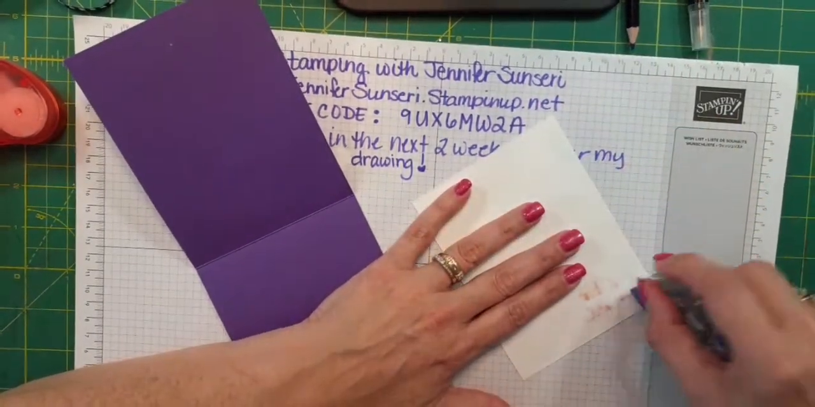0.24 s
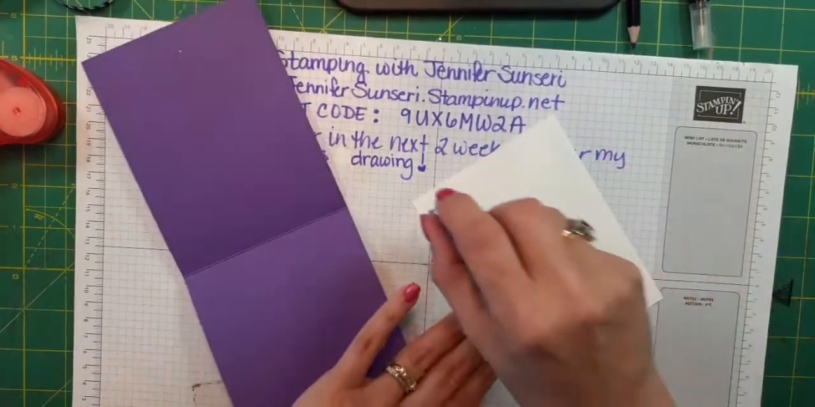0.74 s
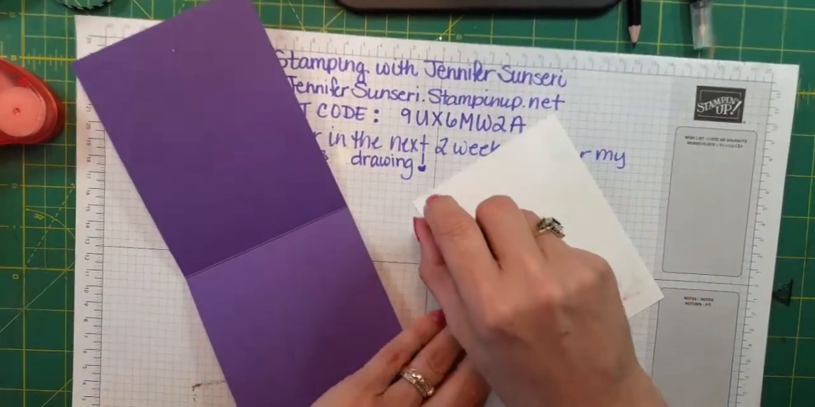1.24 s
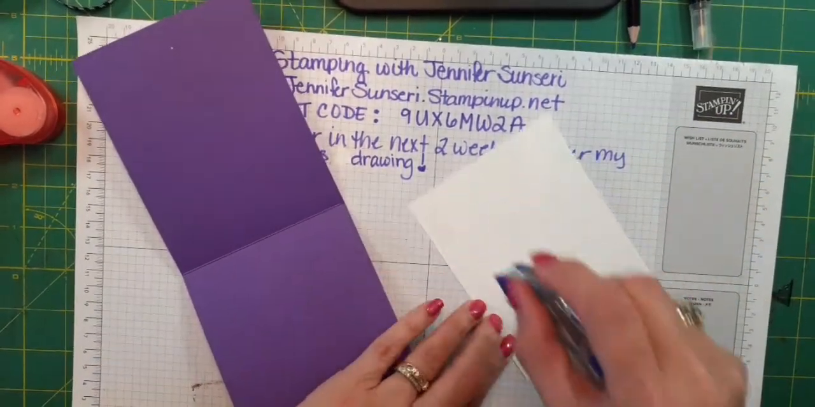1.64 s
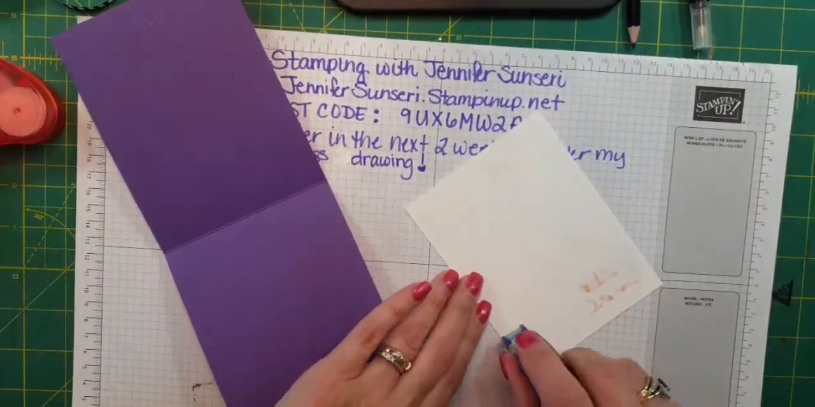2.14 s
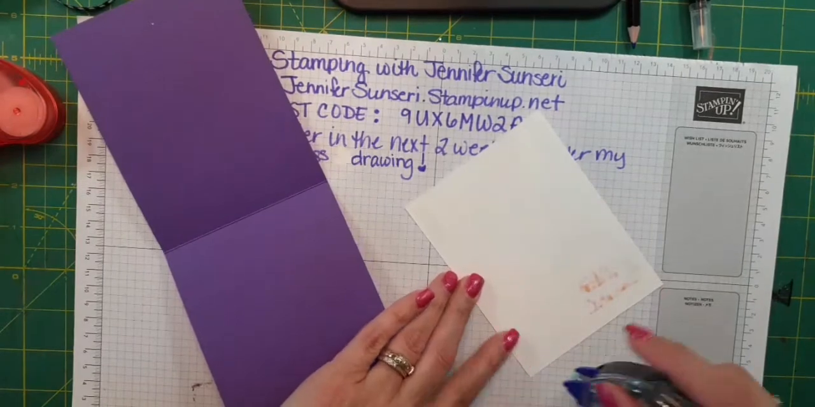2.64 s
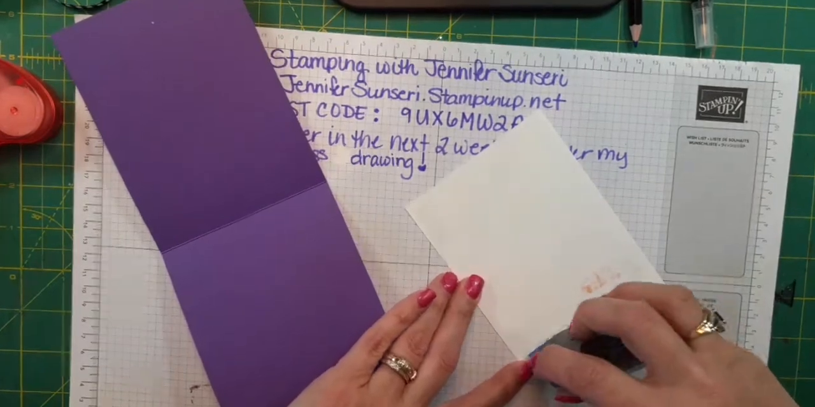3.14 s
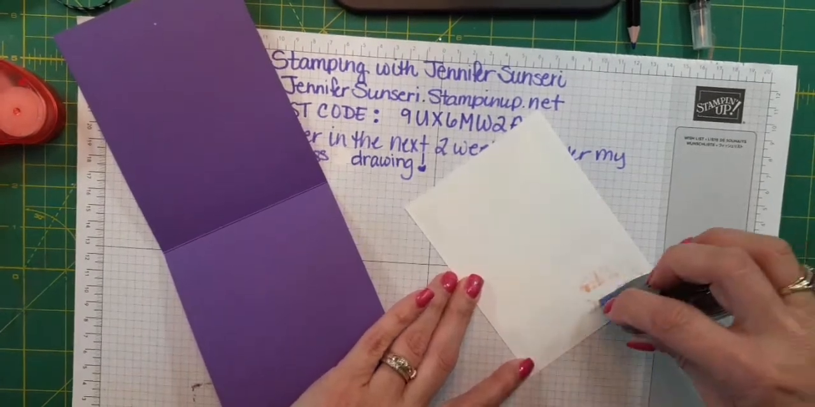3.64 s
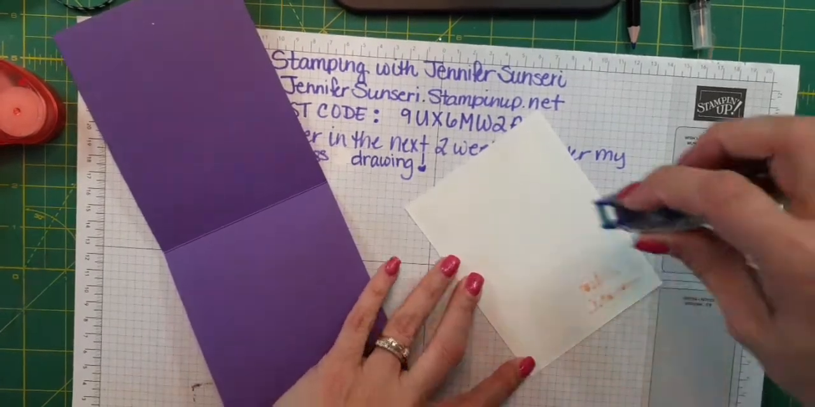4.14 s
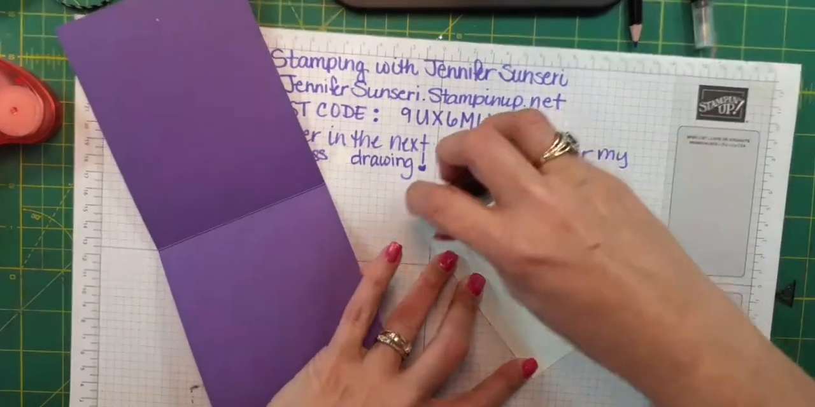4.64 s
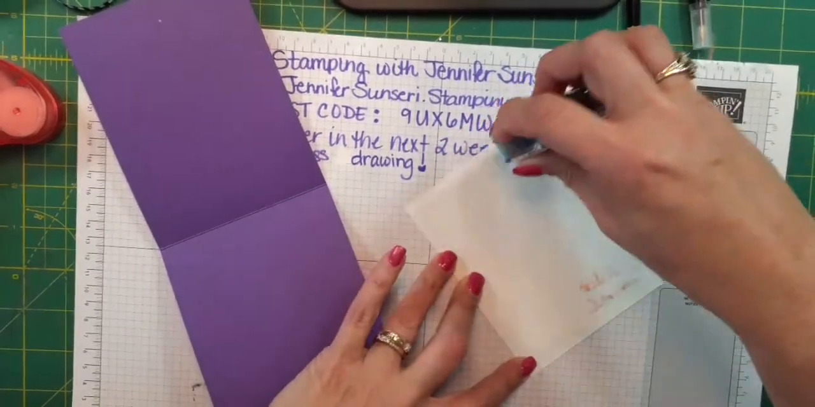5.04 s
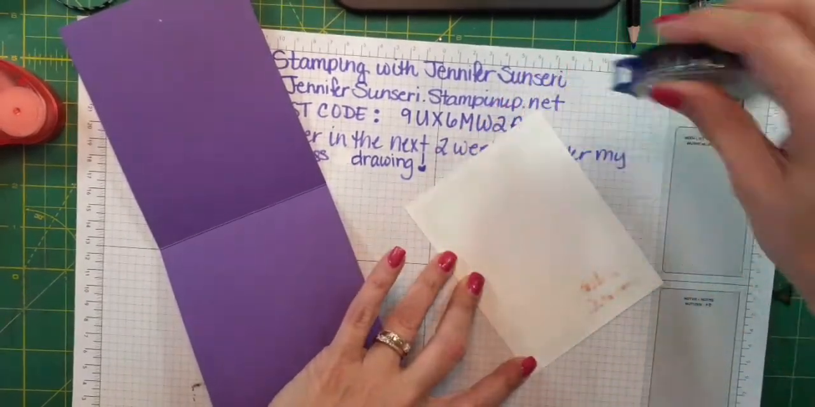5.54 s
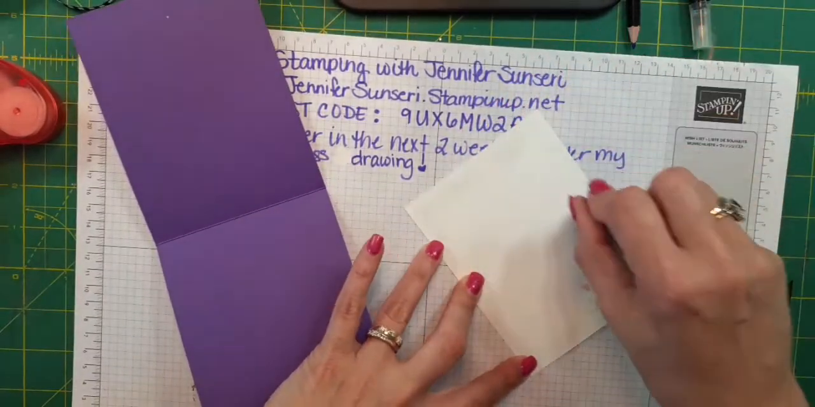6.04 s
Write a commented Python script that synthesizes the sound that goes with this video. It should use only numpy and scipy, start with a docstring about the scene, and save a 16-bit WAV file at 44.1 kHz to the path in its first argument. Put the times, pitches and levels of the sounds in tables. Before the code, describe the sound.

Close by at a craft table, a small plastic tape runner makes eight brief ratcheting zips on paper, each a rapid run of crisp clicks with a sticky hiss. Between them come light snaps, tip knocks, faint paper brushing and soft hand thumps. A low, slightly wavering electrical hum continues in a small, fairly dry room.

```python
"""Small humming room, craft table: a tape runner is drawn in eight short strokes along a paper panel.
Runner: noise bursts, one per ratchet tooth, plus peel hiss, drive table, shell, pawl, glue and case ring.
Hands: the tip knocks down and snaps free (ringing noise bursts), fingers slide on paper (grainy hiss),
and the hand's weight thumps the table (decaying sines).
Background: a wavering low drone with mains hum, rumble and faint hiss."""
import sys
import numpy as np
from scipy import signal
from scipy.fft import rfft, irfft
from scipy.io import wavfile
from scipy.ndimage import uniform_filter1d

SR = 44100
rng = np.random.default_rng(int(sys.argv[2]) if len(sys.argv) > 2 else 0)


def put_to_file(sound):
    """Save the sound as 16-bit audio at rate SR, in the file named by the first command-line argument."""
    columns = np.atleast_2d(sound).T  # one column per channel
    safe = np.clip(columns, -1, 1)
    whole_steps = np.round(safe * 32767)
    wavfile.write(sys.argv[1], SR, whole_steps.astype(np.int16))


N = 277389
TIME = np.arange(N) / SR


def from_db(db):
    """Decibels to amplitude."""
    return 10 ** (np.asarray(db) / 20)


def rms_one(x):
    """Scale to rms 1."""
    return x / np.sqrt(np.mean(x ** 2) + 1e-20)


def colour(x, spectrum, size=8192):
    """Minimum-phase filter with the given spectrum; white noise keeps its power."""
    hz, level_db = np.transpose(spectrum)
    grid_hz = np.maximum(np.arange(size // 2 + 1) * SR / size, 1)
    gain = rms_one(from_db(np.interp(np.log(grid_hz), np.log(hz), level_db)))
    # fold the cepstrum to make the filter causal
    cepstrum = irfft(np.log(gain))
    cepstrum[1:size // 2] *= 2
    cepstrum[size // 2 + 1:] = 0
    impulse = irfft(np.exp(rfft(cepstrum)))
    return signal.oaconvolve(x, impulse[None], axes=1)[:, :x.shape[1]]


def resonance(x, hz, width_hz):
    """One two-pole mode; white noise keeps its power."""
    r = np.exp(-np.pi * width_hz / SR)
    zeros = np.sqrt((1 - r * r) / 2) * np.array([1, 0, -1])
    poles = [1, -2 * r * np.cos(2 * np.pi * hz / SR), r * r]
    return signal.lfilter(zeros, poles, x + 1e-18)


def lowpass(x, order, hz):
    """Butterworth low-pass."""
    return signal.sosfilt(signal.butter(order, hz, fs=SR, output="sos"), x)


def close_pair(x, apart_hz=700, bass_share=0.23):
    """Long waves reach two close microphones almost alike: the side signal loses bass."""
    mid, side = (x[0] + x[1]) / 2, (x[0] - x[1]) / 2
    side = side - (1 - bass_share) * lowpass(side, 1, apart_hz)
    return np.array([mid + side, mid - side])


def stereo_noise(alike, size=N):
    """White noise at two microphones with correlation alike."""
    mid, side = rng.standard_normal((2, size))
    alike = np.clip(alike, -1, 1)
    return (np.sqrt(1 + alike) * mid + np.sqrt(1 - alike) * side * [[1], [-1]]) / np.sqrt(2)


def add(out, start_s, sound):
    """Mix a short sound in at start_s."""
    at = max(round(start_s * SR), 0)
    out[..., at:at + sound.shape[-1]] += sound[..., :out.shape[-1] - at]


def contact(noise, rise_s, hold_s, fade_s):
    """A contact chatters briefly, then dies; energy equals 4 ms at rms 1."""
    t = TIME[:noise.shape[1]]
    burst = noise * np.minimum(t / rise_s, 1) * np.exp(-np.maximum(t - hold_s, 0) / fade_s)
    return rms_one(burst) * np.sqrt(0.004 * SR / len(t))


# waver of the low tone: time_s, relative_level_db
TONE_WAVER = [(0.0, -47.5), (0.05, -50.5), (0.38, -59.5), (0.56, -48.5), (1.01, -55), (1.17, -42),
              (1.26, -52.5), (2.28, -49), (2.35, -67), (2.4, -43), (2.43, -51), (4.47, -49.5), (4.54, -79),
              (4.62, -46.5), (5.04, -59), (5.06, -46), (5.17, -55), (6.29, -49)]
# room rumble spectrum: frequency_hz, relative_level_db
RUMBLE_SPECTRUM = [(20, -14), (35, -8.5), (55, 6), (72, -1), (92, 12.5), (110, 6.5), (160, 7), (195, 7),
                   (225, -3), (270, 0.5), (340, -9.5), (600, -11), (800, -28.5), (1250, -35)]
# room hiss spectrum: frequency_hz, relative_level_db
HISS_SPECTRUM = [(500, 0), (900, 1.5), (1250, 5.5), (1700, -4), (2500, -7.5), (4000, -13), (6300, -12),
                 (9000, -21), (13000, -12.5), (16000, -21)]


def background(mains_hz=120, drone_hz=124):
    """Narrow-band noise beside a mains-hum sine wavers in level, over rumble and faint hiss."""
    drone = resonance(stereo_noise(1.0), drone_hz, width_hz=30.4)
    drone = rms_one(resonance(drone, drone_hz, width_hz=22.0))
    tone = drone + np.sin(2 * np.pi * mains_hz * TIME)
    # level it over a third of a second, then apply the waver
    tone = tone / np.sqrt(uniform_filter1d(np.mean(tone ** 2, axis=0), SR // 3))
    waver = from_db(np.interp(TIME, *np.transpose(TONE_WAVER)))
    rumble = lowpass(colour(stereo_noise(0.75), RUMBLE_SPECTRUM), 2, 1300)
    low = from_db(0.5) * waver * tone + from_db(-56.0) * rumble
    hiss = from_db(-72) * colour(stereo_noise(0.078), HISS_SPECTRUM)
    return low * from_db([[0.7], [-0.7]]) + hiss  # lows lean left


def room(x, bounce_db=-8, near_db=-7, near_t60_s=0.081, far_db=-13, far_t60_s=0.27):
    """The table top bounces sound after 3 ms, nearby things scatter it, walls add a duller tail."""
    t = TIME[:SR // 2]
    onset = np.clip((t - 0.006) / 0.00068, 0, 1)
    shapes = [np.exp(-((t - 0.003) / 0.00041) ** 2),
              onset * from_db(-60 * t / near_t60_s),
              onset * from_db(-60 * t / far_t60_s)]
    bounce, near, far = [rms_one(stereo_noise(0.1, len(t)) * shape) / np.sqrt(len(t)) for shape in shapes]
    far = lowpass(far, 1, 9000)
    echoes = from_db(bounce_db) * bounce + from_db(near_db) * near + from_db(far_db) * far
    return x + signal.oaconvolve(x, echoes, axes=1)[:, :N]


# the hand's weight landing on the table: start_s, level_db
THUMP_EVENTS = [(2.14, -54.5), (3.039, -49.5), (3.61, -51), (4.43, -58.5), (5.061, -44.5)]


def thumps(table_hz=54, swell_s=0.023, board_hz=272, board_db=-8, board_s=0.018):
    """The table top swings slowly under the hand, with a shorter boom above."""
    t = TIME[:SR // 2]

    def swelling_sine(hz, peak_s):
        return (t / peak_s * np.exp(1 - t / peak_s)) ** 2 * np.sin(2 * np.pi * hz * t)

    thump = swelling_sine(table_hz, swell_s) + from_db(board_db) * swelling_sine(board_hz, board_s)
    out = np.zeros((2, N))
    for start_s, level_db in THUMP_EVENTS:
        add(out, start_s, from_db(level_db) * thump)
    return out


# fingers and paper sliding: start_s, length_s, relative_level_db
SLIDE_EVENTS = [(0.178, 0.22, -70), (0.318, 0.11, -61.5), (0.395, 0.11, -62.5), (0.516, 0.2, -72.5),
                (0.685, 0.091, -74.5), (1.31, 0.12, -65.5), (1.533, 0.15, -67.5), (1.76, 0.3, -73.5),
                (1.909, 0.056, -71.5), (2.47, 0.26, -72.5), (2.647, 0.21, -66.5), (2.815, 0.12, -68.5),
                (3.606, 0.13, -67.5), (3.906, 0.079, -55.5), (3.967, 0.082, -64.5), (4.01, 0.22, -71.5),
                (5.493, 0.082, -61), (5.566, 0.1, -60), (5.785, 0.068, -62.5), (6.243, 0.07, -72.5)]
# brushed paper spectrum: frequency_hz, relative_level_db
PAPER_SPECTRUM = [(1200, -11.5), (2500, -4.5), (4000, -6.5), (6300, -3.5), (9000, -8), (13000, -6.5),
                  (16000, -8)]


def slides(grains_per_s=140, grain_db=7, attack_share=0.23):
    """Skin and paper brush with a faint fibrous hiss; now and then a fibre catches."""
    level = np.zeros(N)
    for start_s, length_s, level_db in SLIDE_EVENTS:
        progress = (TIME - start_s) / length_s
        level += from_db(level_db) * np.interp(progress, [0, attack_share, 1], [0, 1, 0])
    grains = 1.0 * (rng.random(N) < grains_per_s / SR)
    catches = signal.lfilter([1], [1, -np.exp(-1 / (0.0014 * SR))], grains + 1e-18)
    roughness = from_db(1.5 * rng.standard_normal(N))
    fibres = rms_one(stereo_noise(0.057) * roughness * (1 + from_db(grain_db) * catches))
    return from_db(-0.5) * colour(level * fibres, PAPER_SPECTRUM)


# bright edge of knocks and ticks: frequency_hz, relative_level_db
EDGE_SPECTRUM = [(3000, -26.5), (5200, -3), (6800, 1), (9000, -0.5), (13000, -4), (16000, 0)]


def touches(events, spectrum, rise_s, fade_s, ring_db):
    """Light contacts: a coloured body, a bright edge, and a ring that depends on the spot touched."""
    body, edge, rings = np.zeros((3, 2, N))
    for start_s, level_db, sharp_db, ring_hz in events:
        noise = stereo_noise(0.11, size=2048)
        touch = from_db(level_db) * contact(noise, rise_s, hold_s=rise_s, fade_s=fade_s)
        add(body, start_s, touch)
        add(edge, start_s, from_db(sharp_db) * touch)
        add(rings, start_s, resonance(touch, ring_hz, width_hz=0.065 * ring_hz))
    ringing_body = colour(body, spectrum) + from_db(ring_db) * rings
    return ringing_body / np.hypot(1, from_db(ring_db)) + colour(edge, EDGE_SPECTRUM)


# tip snapping free, case ticking in the grip: start_s, relative_level_db, sharpness_db, ring_hz
TICK_EVENTS = [(2.15, -69, 2, 3550), (2.539, -68.5, 2, 2290), (2.651, -64, -7, 2170), (2.676, -57, 2, 2020),
               (2.682, -56, -7, 2040), (2.76, -57.5, -5, 3040), (3.924, -53.5, 11, 4730),
               (3.942, -46, 5.5, 5160), (4.778, -55, 8, 6140), (4.794, -60.5, 5, 5700),
               (5.117, -57, -11, 1970), (5.337, -44.5, -5.5, 3370), (5.354, -47, -5, 2940),
               (5.392, -56, -7, 3700), (5.494, -60.5, 0, 1980), (5.587, -54, -2, 2800),
               (6.138, -76, 9, 5710)]
# tick body spectrum: frequency_hz, relative_level_db
TICK_SPECTRUM = [(700, -3.5), (1300, 6), (2000, 4.5), (2600, 4.5), (3500, 4), (4800, 1.5), (6000, -9),
                 (16000, -50)]


def ticks():
    """The tip snaps free and the case ticks: fast, short contacts with a strong ring."""
    return from_db(-0.1) * touches(TICK_EVENTS, TICK_SPECTRUM, rise_s=0.00077, fade_s=0.002, ring_db=0.5)


# tip knocking down on the paper: start_s, relative_level_db, sharpness_db, ring_hz
KNOCK_EVENTS = [(3.04, -60.5, -4, 1440), (3.632, -56, -14, 1450), (4.44, -44, -25, 1314),
                (4.446, -54, -13, 1350), (4.453, -45, -33, 1340), (4.538, -49, -18, 1420),
                (4.551, -50.5, -3, 1460), (5.06, -44, -10.5, 1490), (5.07, -43.5, -29, 1890),
                (5.08, -50, -16, 1810), (5.109, -49.5, -21, 1700), (5.793, -55, -32, 1350),
                (5.813, -50, -5, 2580), (5.821, -47.5, -26, 2440), (5.876, -52, -28, 1430),
                (5.888, -49, -15, 1390)]
# knock body spectrum: frequency_hz, relative_level_db
KNOCK_SPECTRUM = [(250, -2), (600, -15), (950, -16), (1230, 5), (1500, 0), (1900, -1.5), (2300, -6),
                  (2750, -4), (3600, -10.5), (4600, -7.5), (7000, -16.5), (16000, -40)]


def knocks():
    """The tip knocks down on the paper: slower, duller contacts with a weaker ring."""
    return from_db(2.3) * touches(KNOCK_EVENTS, KNOCK_SPECTRUM, rise_s=0.0024, fade_s=0.0076, ring_db=-4)


def ratchet(count, first_ms, last_ms, starting_ms, stopping_ms,
            level_db, soft_db, fade_db, first_sharp_db, last_sharp_db):
    """Clicks of one stroke (start_s, level_db, sharp_db): the spool gets going, runs, drags to a stop."""
    start_drag_kept, stop_drag_kept = 0.3, 0.1  # share of lost time reaching the next tooth inwards
    bite_teeth, fade_power = 1.12, 2.9  # bears down within a tooth or two, eases off late
    scatter_ms, scatter_db, sharp_scatter_db = 0.25, 1.5, 2.1  # no two teeth are quite alike
    tooth = np.arange(round(count))
    gap, progress = tooth[:-1], tooth / tooth[-1]
    late, strong, sharp = rng.standard_normal((len(tooth), 3)).T
    gaps_ms = np.linspace(first_ms, last_ms, len(gap))
    gaps_ms += starting_ms * start_drag_kept ** gap
    gaps_ms += stopping_ms * stop_drag_kept ** gap[::-1]
    start_s = np.append(0, np.cumsum(gaps_ms) + scatter_ms * late[1:]) / 1000
    click_db = level_db - soft_db * np.exp(-tooth / bite_teeth) - fade_db * progress ** fade_power
    click_db += scatter_db * strong
    sharp_db = np.linspace(first_sharp_db, last_sharp_db, len(tooth)) + sharp_scatter_db * sharp
    return np.column_stack([start_s, click_db, sharp_db])


def stroke(clicks, table_db, case_hz, width_hz, ring_db, upper_db, sizzle_db, peel_db, lead_ms, pan_db=-0.5):
    """Force one stroke sends into table, shell, pawl and glue, and the ring of the hollow case."""
    t, size = TIME[:SR // 4], 1024
    middle, treble = np.zeros((2, 2, len(t)))
    pattern = stereo_noise(0.48, size)  # every tooth rattles the case in much the same way
    for start_s, level_db, sharp_db in clicks:
        rattle = pattern + 1.02 * stereo_noise(0.15, size)
        rattle[1] = np.interp(t[:size] - lead_ms / 1000, t[:size], rattle[1])
        rattle = rattle * from_db([[pan_db], [-pan_db]])
        # pawl ping varies in pitch and level per tooth
        ping_hz = 6800 * 2 ** rng.normal(0, 0.12)
        ping = from_db(-15 + 9.4 * rng.uniform(-0.87, 1)) * resonance(rattle, ping_hz, width_hz=700)
        snap = contact(rattle + ping, rise_s=0.00088, hold_s=0.0011, fade_s=0.002)
        add(treble, start_s, from_db(level_db + sharp_db) * snap)
        # the heavier shell answers more slowly
        knock = contact(rattle, rise_s=0.001, hold_s=0.0013, fade_s=0.003)
        add(middle, start_s, from_db(level_db) * knock)
    # tape peels with a grainy hiss, louder the faster the spool turns
    start_s, level_db, sharp_db = clicks.T
    speed = np.interp(t, start_s, rms_one(1 / np.gradient(start_s)), 0, 0)
    grain = from_db(3.6 * rng.standard_normal(len(t)))
    peel = from_db(peel_db) * speed * rms_one(stereo_noise(0.26, len(t)) * grain)
    middle = middle + peel * from_db(np.interp(t, start_s, level_db))
    treble = treble + peel * from_db(np.interp(t, start_s, level_db + sharp_db))
    # the blow's energy is shared out between the parts
    middle = middle / np.sqrt(1 + from_db(ring_db) ** 2 + from_db(upper_db) ** 2)
    treble = treble / np.hypot(1, from_db(sizzle_db))
    ring = from_db(ring_db) * resonance(middle, case_hz, width_hz)
    ring = ring - from_db(upper_db) * resonance(middle, 2 * case_hz, 2 * width_hz)
    return np.array([from_db(table_db) * middle, middle, treble, from_db(sizzle_db) * treble, ring])


# stroke motion: start_s, click_count (rounded), first_gap_ms, last_gap_ms, starting_loss_ms,
# stopping_loss_ms, level_db, first_click_softer_db, fade_db, first_sharpness_db, last_sharpness_db
# (gaps before the losses are added; sharpness = treble over middle)
STROKE_MOTIONS = [(0.0025, 6.45, 7.6, 20.6, 4.25, 8.7, -39.5, -2, 0.5, 8.5, 8.5),
                  (1.0839, 11.3, 14.5, 12.8, 10.6, 7.8, -33.5, 11.5, -2, 0.2, 1),
                  (2.243, 8.8, 12.4, 13.5, 12.4, 8.9, -36.5, 10, 0.5, 6.5, -0.2),
                  (3.1466, 14.5, 4.8, 10.84, 15.2, 25.7, -38, 4.5, 3.5, 4.5, 6.5),
                  (3.698, 13.8, 6.42, 6.4, 5.04, 9.3, -37, 10, 3.5, 3.5, 7.5),
                  (4.566, 16.2, 5.8, 6.6, 5.4, 11.0, -36, 6.5, 1, 2, 5.5),
                  (5.1247, 11.9, 7.1, 6.45, 2.92, 3.4, -31.5, 6, 6.5, -5, 7.5),
                  (5.9093, 11.6, 7.3, 13.2, 8.5, 7.5, -37, 4.5, 2, 1, 7.5)]
# runner in the grip, per stroke: table_db, case_hz, case_width_hz, ring_db, upper_ring_db,
# sizzle_db, peel_db, left_lead_ms
STROKE_GRIPS = [(-10, 1410, 180, -8, -19, -10, -11, 0.0905),
                (-15.5, 1420, 170, -2.5, 0, -16, -17.5, -0.061),
                (-17.5, 1410, 190, 0, -11.5, -21, -16.5, -0.0295),
                (-7.5, 1590, 300, -4.5, -14, -4.5, -15, -0.112), (-8, 1550, 420, -4.5, -20, 3.5, -4, 0.17),
                (-9.5, 1260, 750, -1.5, -10, -5, -10.5, 0.0012), (-10, 1470, 480, 3, -19, 1.5, -6, 0.094),
                (-13, 1480, 190, -5.5, -15, -8.5, -12, 0.068)]
# table under the tip: frequency_hz, relative_level_db
TABLE_SPECTRUM = [(120, -15), (260, -1), (450, -3.5), (620, -2), (800, -4.5), (1100, 6), (1600, -15),
                  (4000, -41.5)]
# plastic shell: frequency_hz, relative_level_db
SHELL_SPECTRUM = [(600, -37.5), (950, -5.5), (1200, -3.5), (1550, -10.5), (1850, -1.5), (2100, 2),
                  (2450, 1), (2950, 5.5), (3500, 0), (4200, 1.5), (5000, -0.5), (7000, -37), (16000, -66.5)]
# pawl snap: frequency_hz, relative_level_db
SNAP_SPECTRUM = [(2000, -43), (4200, -22.5), (5200, -0.5), (5900, 0), (6600, 1.5), (7400, -1), (8200, 0.5),
                 (9200, -6), (11000, -3), (12800, 5.5), (15500, 0), (17000, -37.5)]
# glue sizzle: frequency_hz, relative_level_db
SIZZLE_SPECTRUM = [(6000, -26), (10000, -7), (12000, -8), (14000, 7), (15400, 2.5), (17000, -19)]


def runner():
    """All strokes; table, shell, snap and sizzle are coloured, the case ring is band-limited."""
    parts = np.zeros((5, 2, N))
    for (start_s, *motion), grip in zip(STROKE_MOTIONS, STROKE_GRIPS):
        add(parts, start_s, stroke(ratchet(*motion), *grip))
    table, shell, snap, sizzle, ring = parts
    ring = signal.sosfilt(signal.butter(4, [1040, 3900], "band", fs=SR, output="sos"), ring)
    return (colour(table, TABLE_SPECTRUM) + from_db(1.5) * colour(shell, SHELL_SPECTRUM) + ring
            + from_db(-2.0) * colour(snap, SNAP_SPECTRUM) + colour(sizzle, SIZZLE_SPECTRUM))


def scene():
    """Runner and hands on the table, in the humming room."""
    on_table = slides() + ticks() + knocks() + runner()
    return background() + thumps() + close_pair(room(on_table))


def record(dry):
    """Steep elliptic low-pass cuts the top."""
    cutoff_hz = 16200
    return signal.sosfilt(signal.ellip(10, 0.3, 80, cutoff_hz, fs=SR, output="sos"), dry)


dry = scene()
out = record(dry)
put_to_file(out)
```